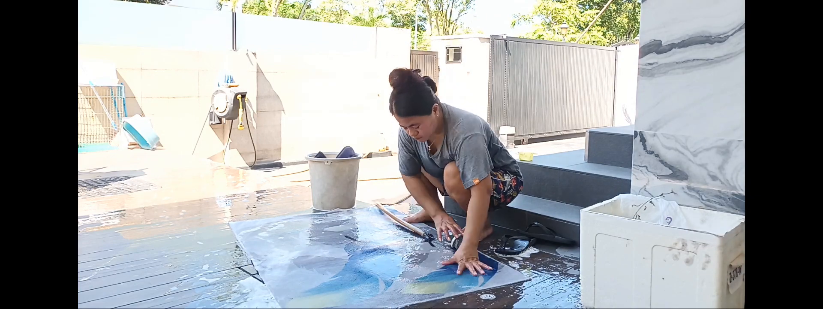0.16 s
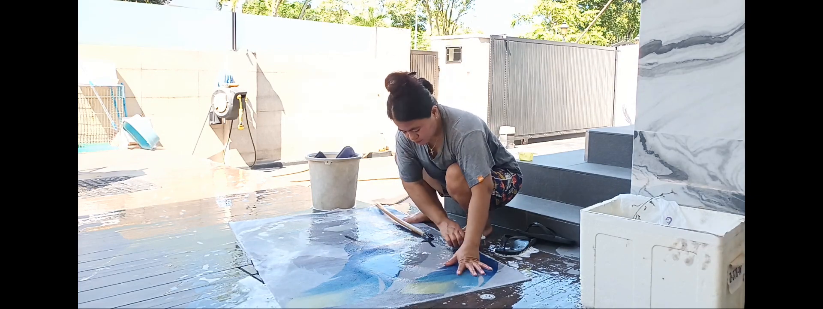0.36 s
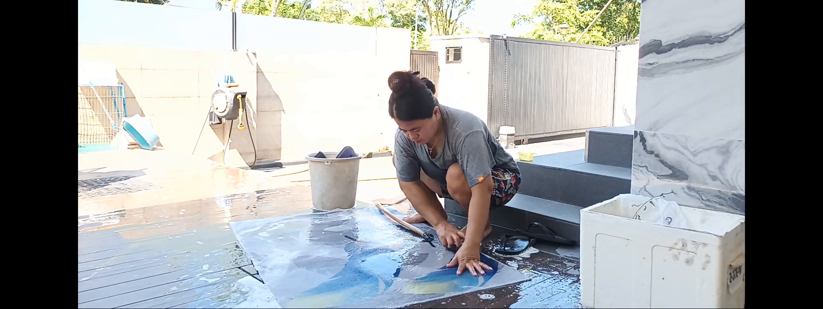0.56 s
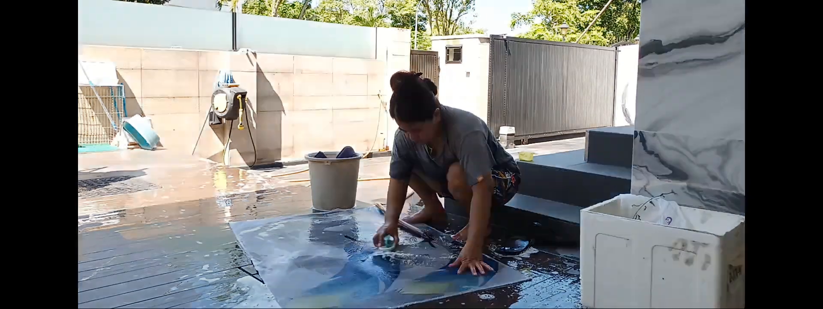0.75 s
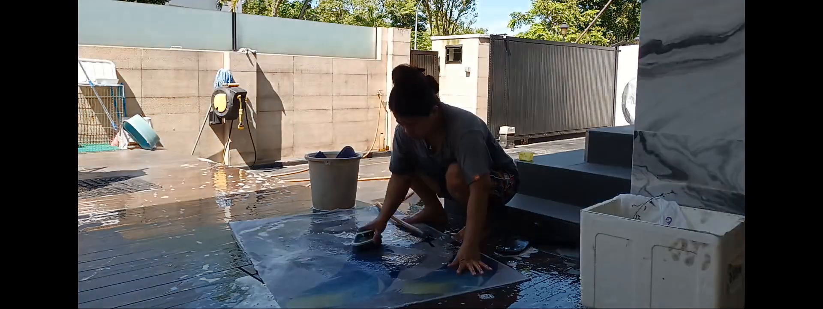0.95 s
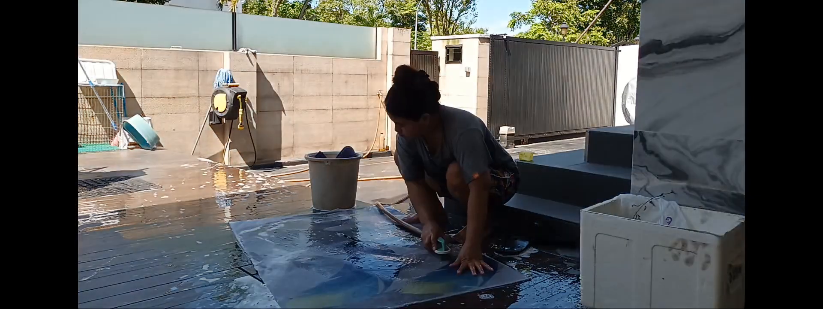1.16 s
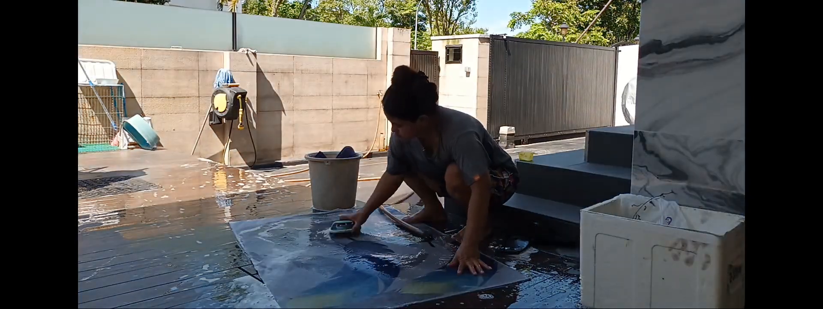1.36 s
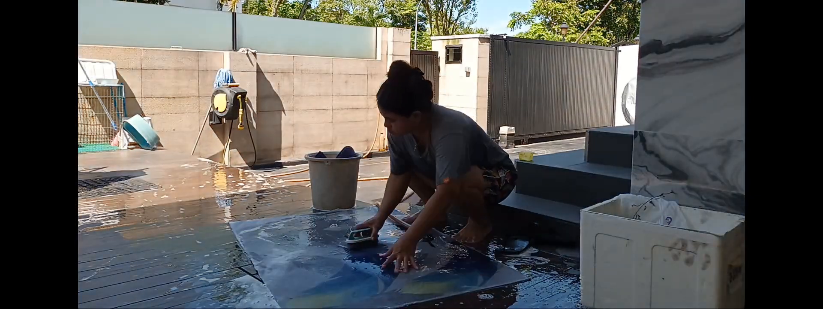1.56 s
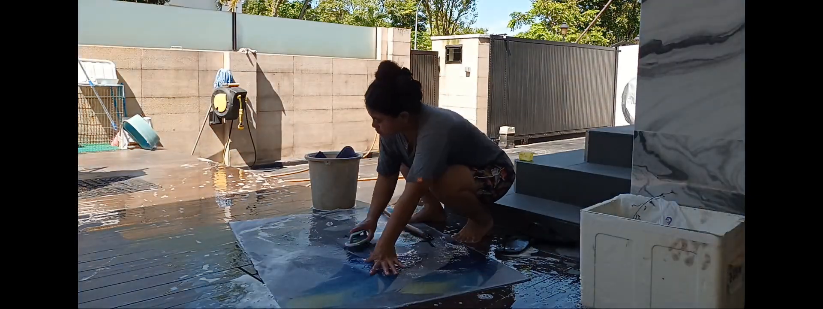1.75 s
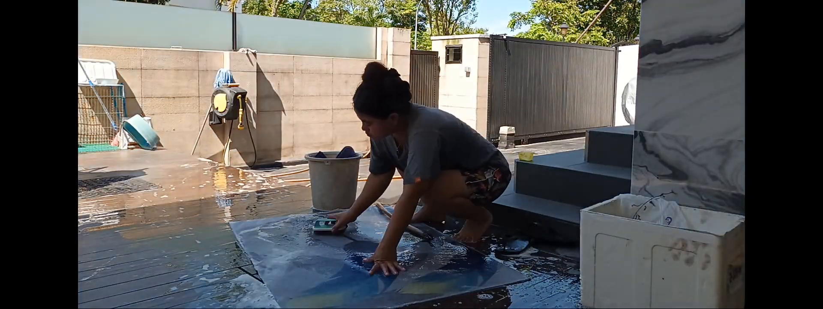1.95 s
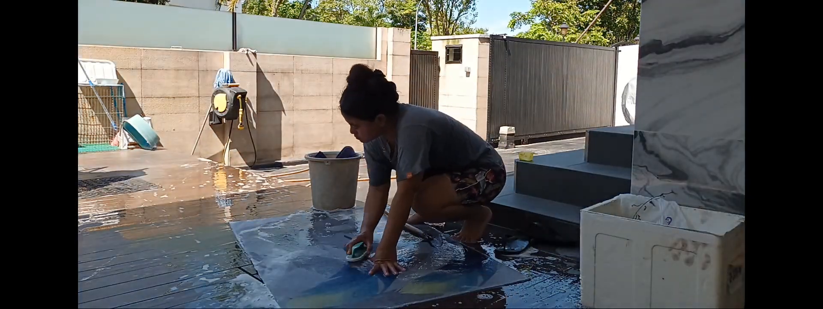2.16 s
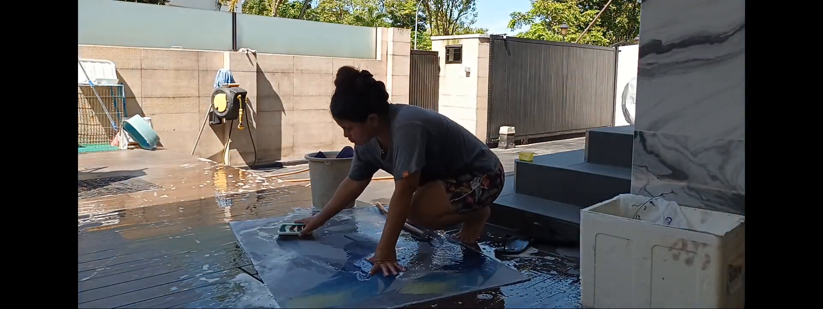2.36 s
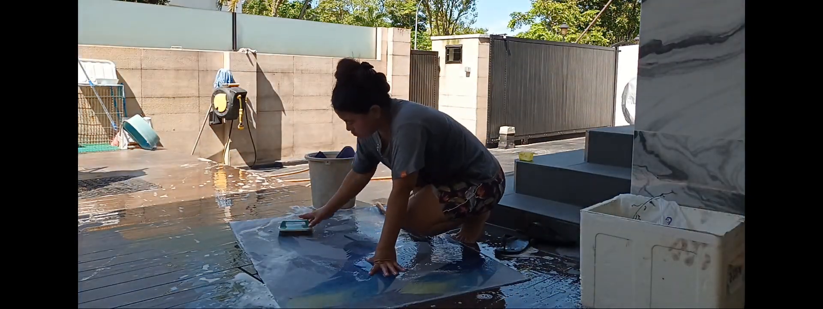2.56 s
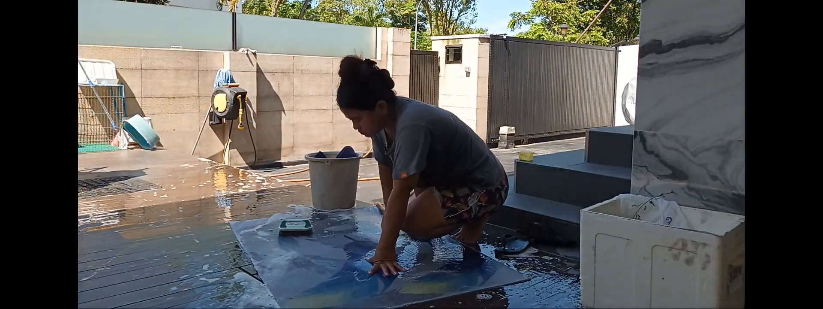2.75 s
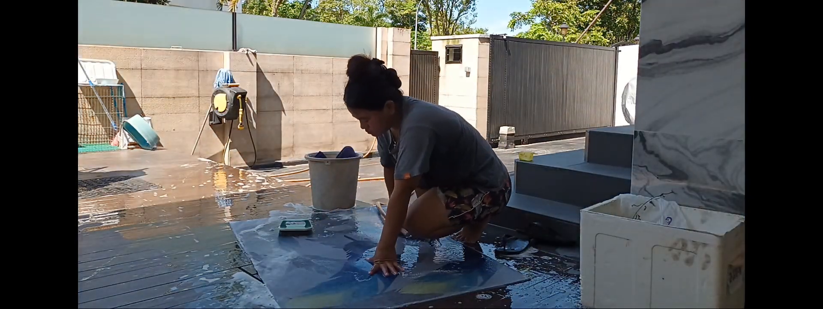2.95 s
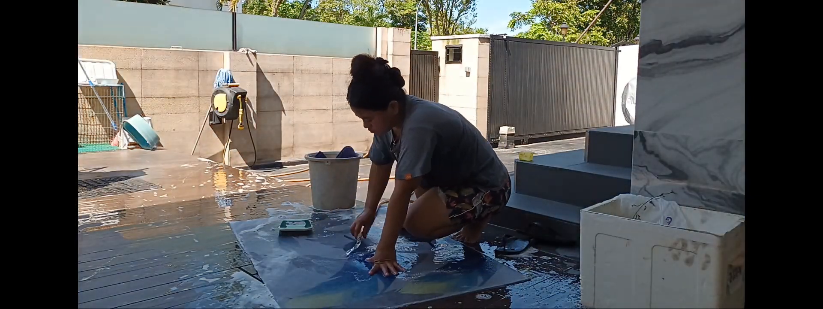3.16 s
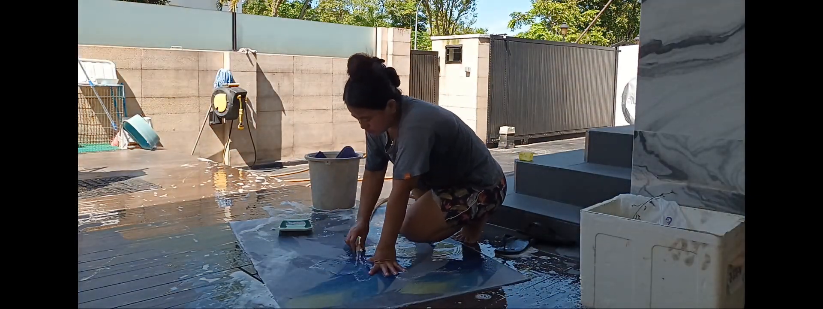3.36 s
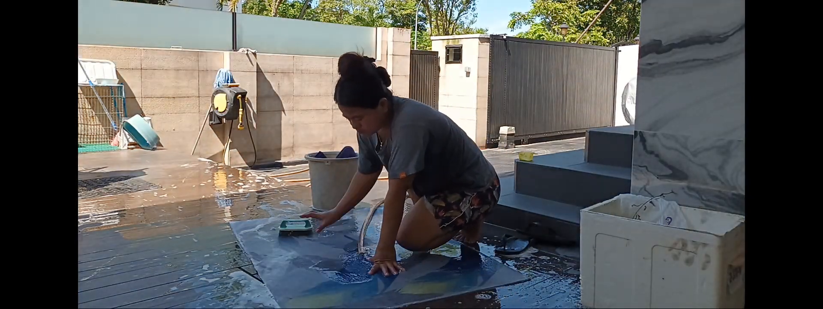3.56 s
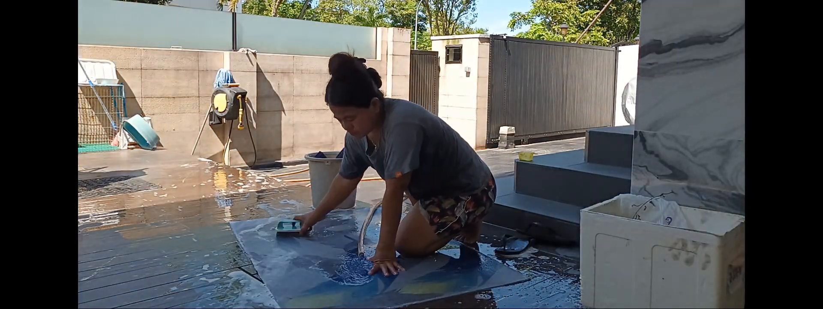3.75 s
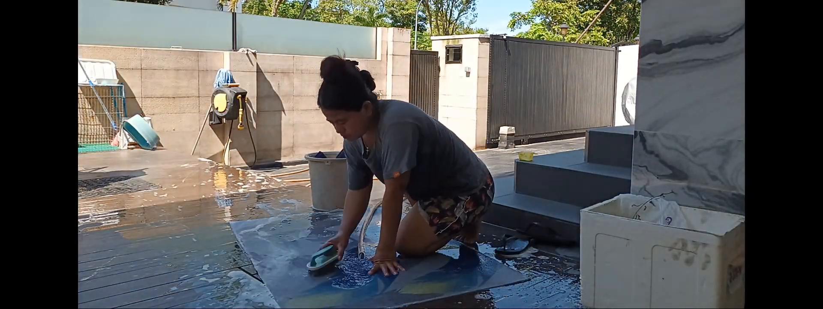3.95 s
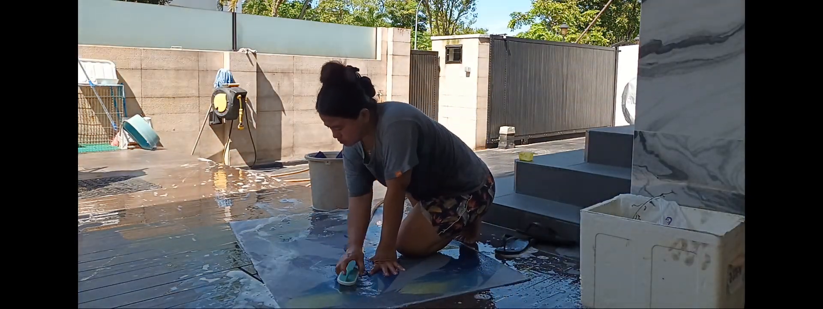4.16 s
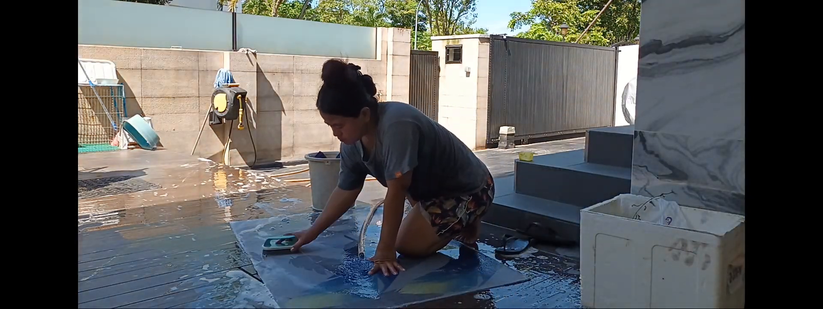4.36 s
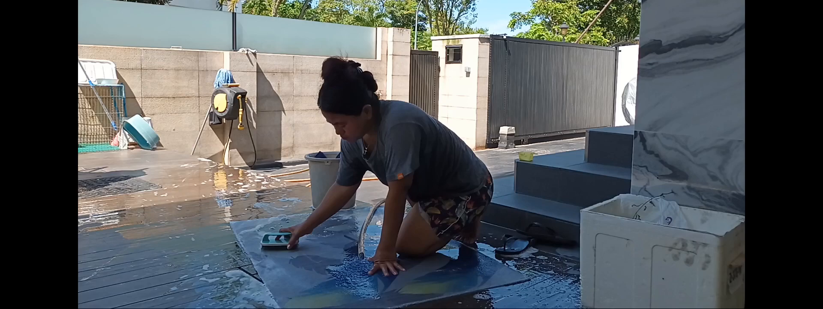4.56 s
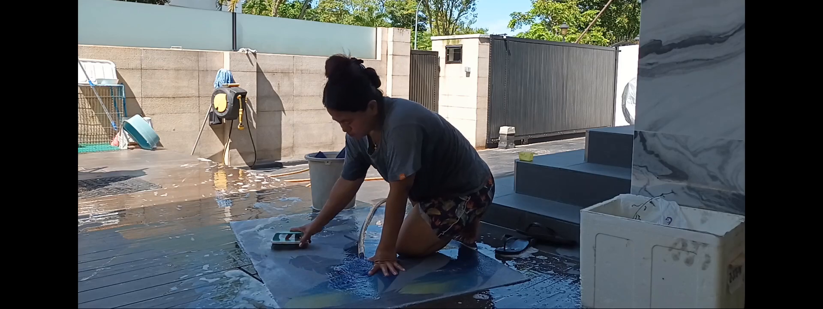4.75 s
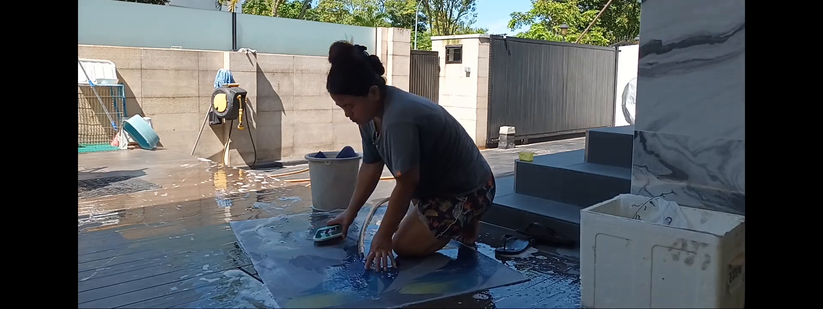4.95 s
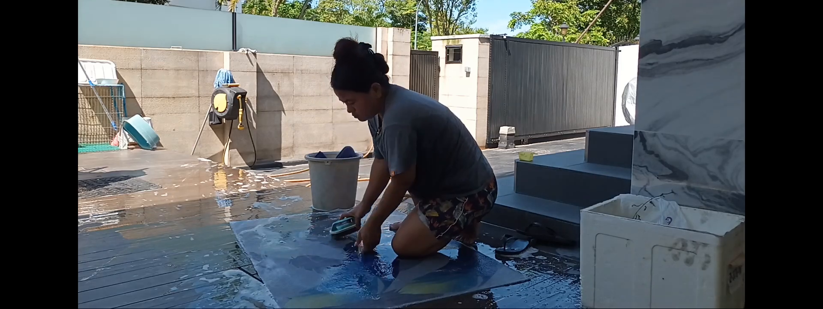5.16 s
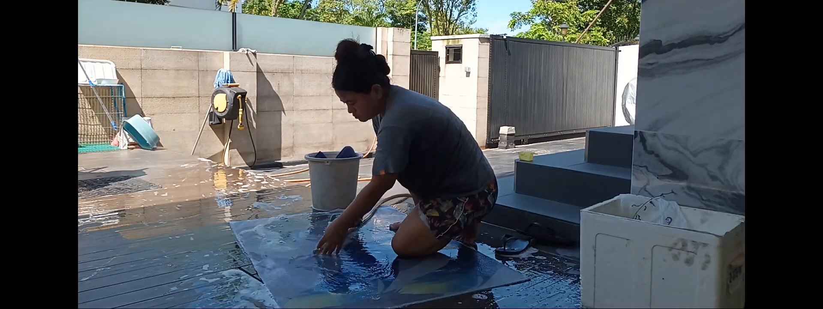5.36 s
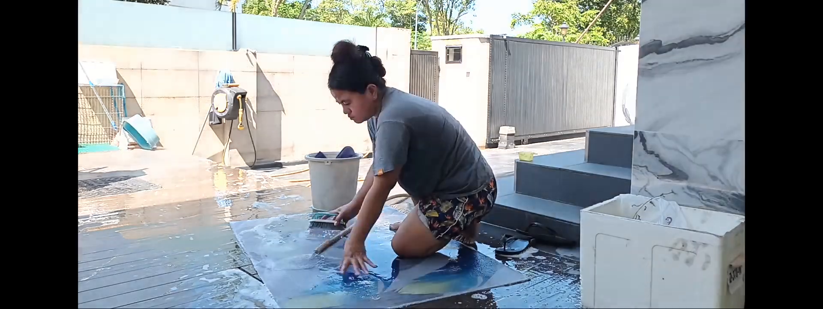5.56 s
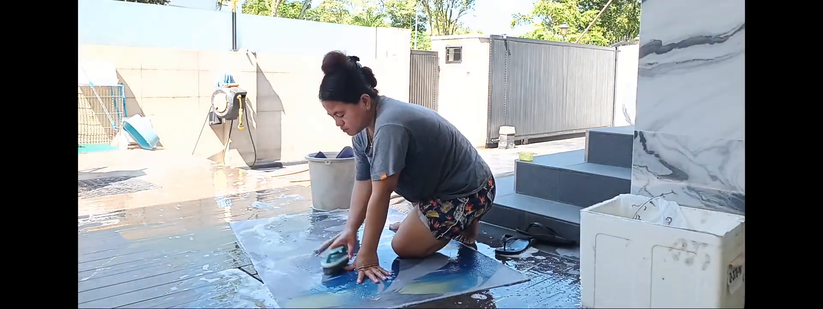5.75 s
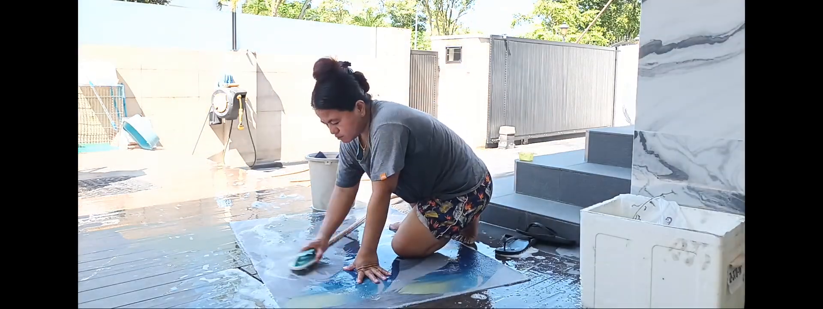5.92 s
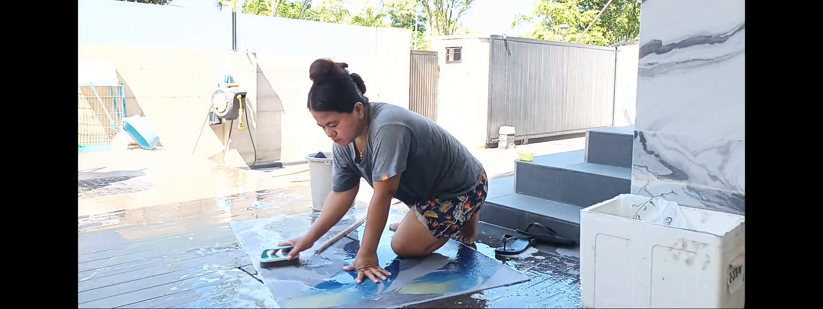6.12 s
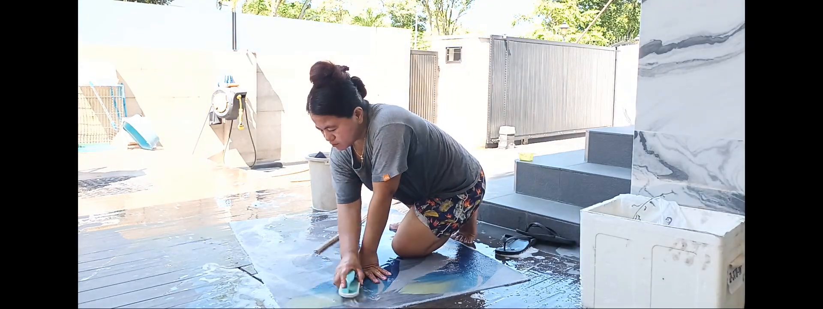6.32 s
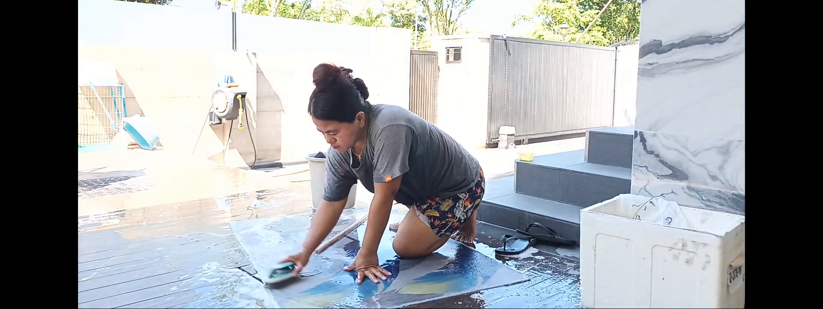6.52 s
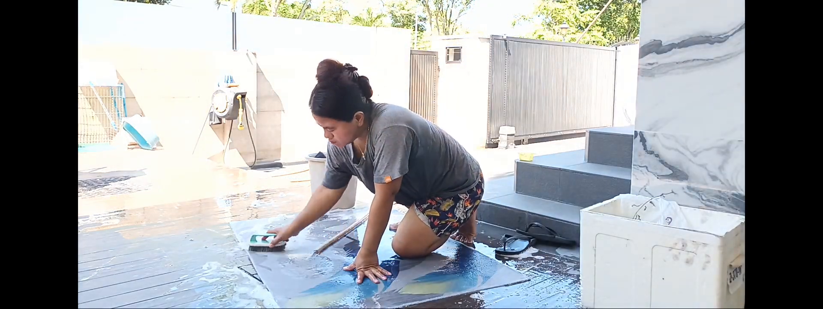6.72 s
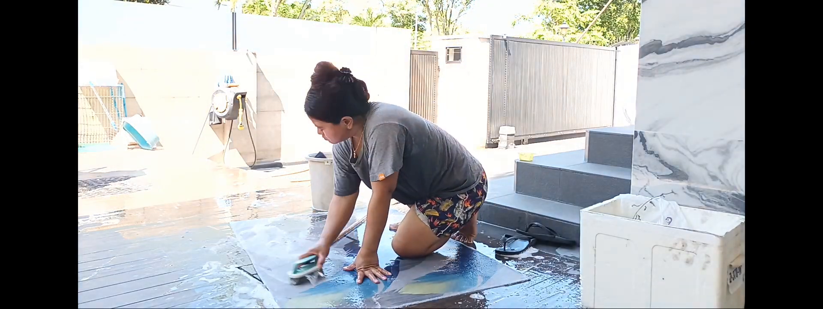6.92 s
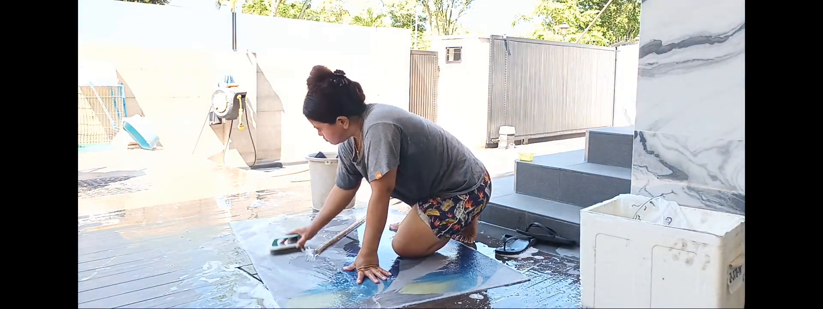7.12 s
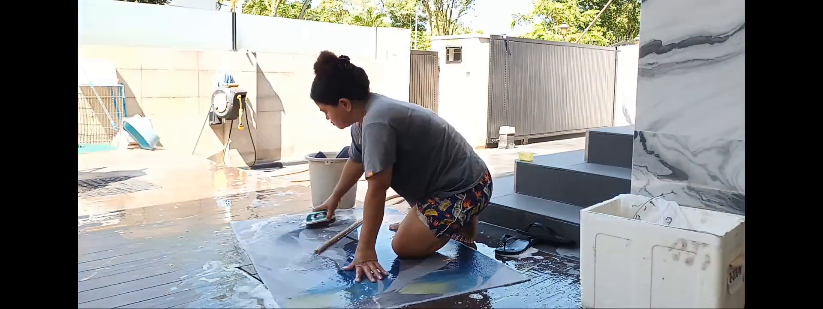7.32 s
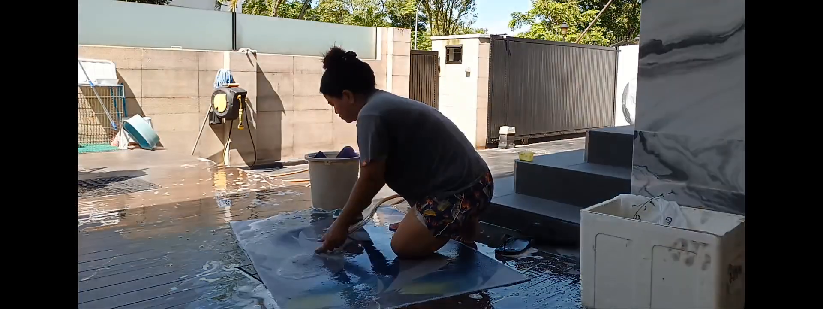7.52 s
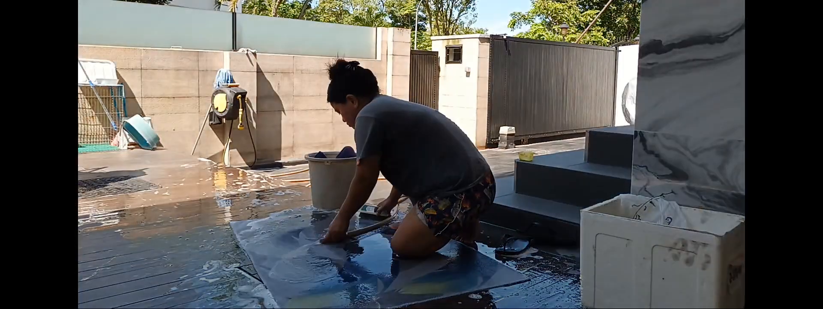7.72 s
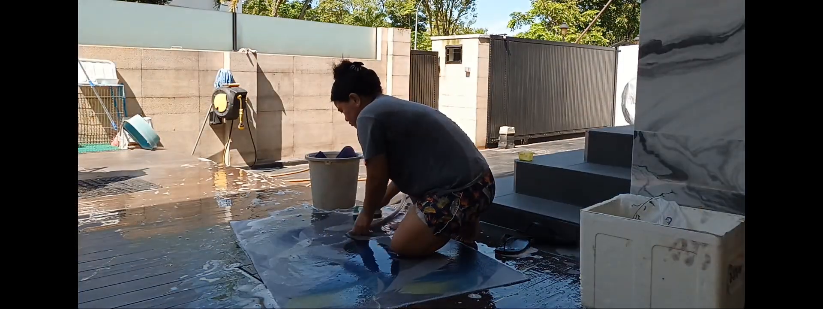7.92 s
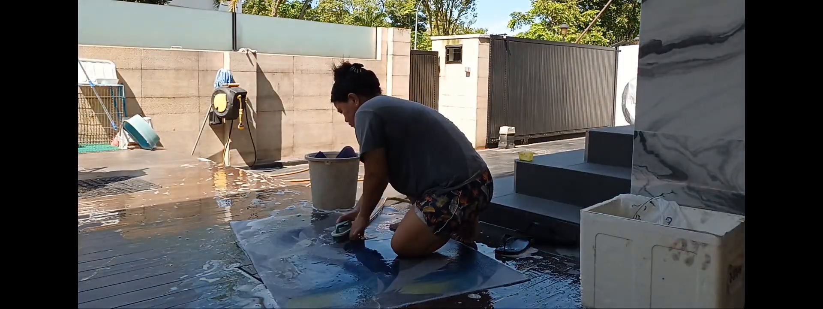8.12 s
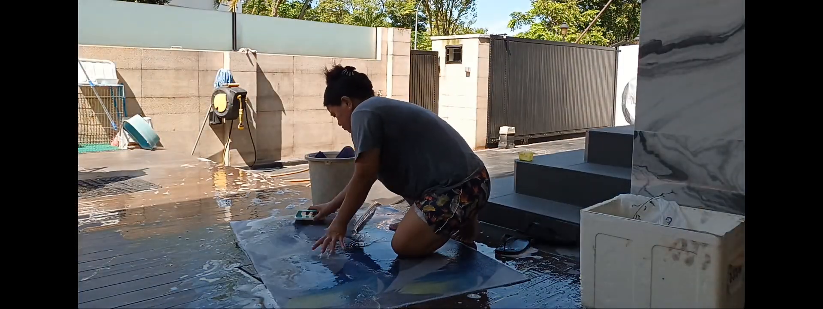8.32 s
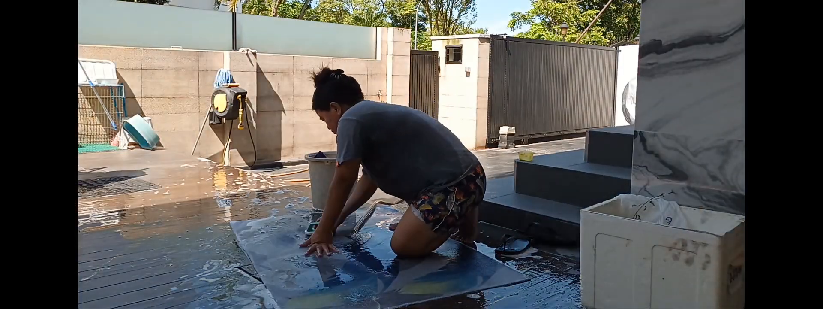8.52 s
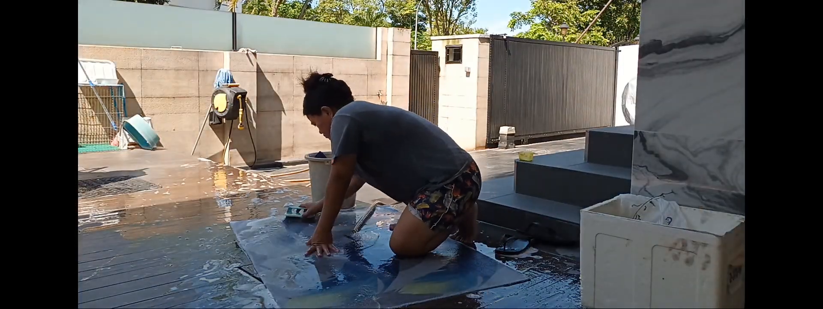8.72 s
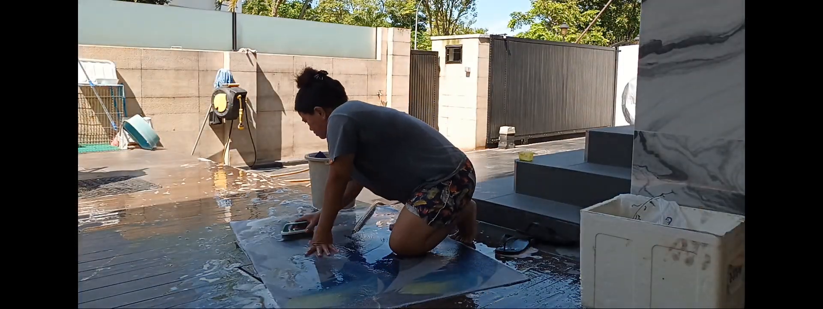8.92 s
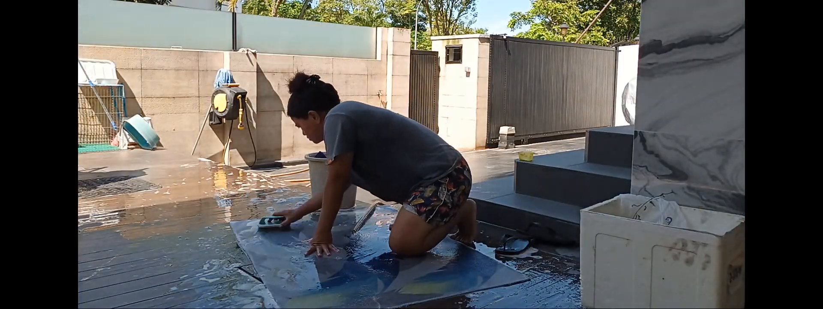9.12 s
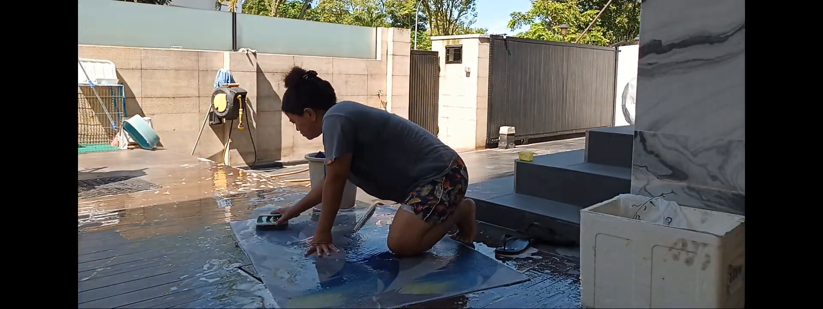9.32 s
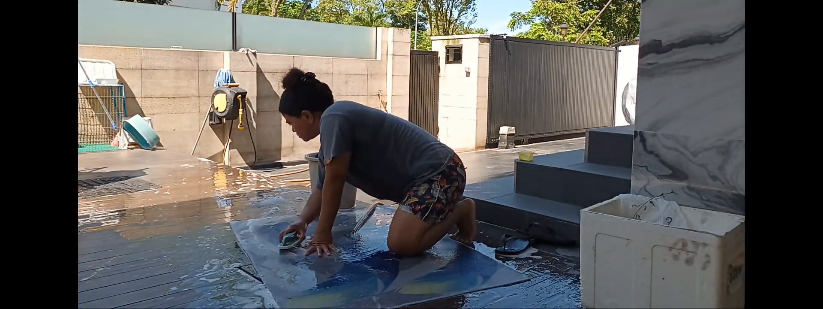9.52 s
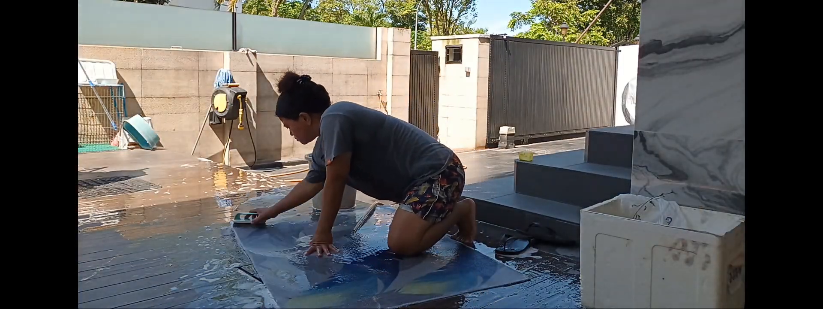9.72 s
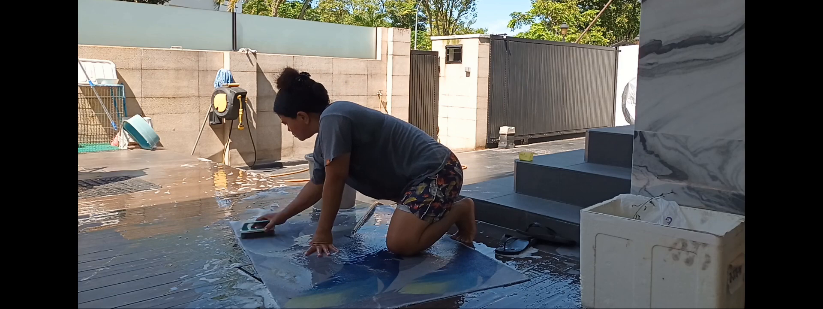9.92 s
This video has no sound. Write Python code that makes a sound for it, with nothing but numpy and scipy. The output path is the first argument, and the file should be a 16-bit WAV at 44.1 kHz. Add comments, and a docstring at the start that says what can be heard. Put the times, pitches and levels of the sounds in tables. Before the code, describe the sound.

A hand brush scrubs a wet, soapy carpet in a tiled yard. A quick run of raspy back-and-forth strokes gives way to a pause, a few bristle slaps and strokes, then two more runs, the last the fastest. Suds gurgle and foam crackles faintly behind the brush. Two dull thuds fall in the first half, and one brief squeak comes later. The walls add a short tail over quiet air.

```python
"""A tiled yard: a hand brush scrubs a soapy carpet in quick back-and-forth strokes, with pauses.
Bristle tips flick through the wet pile, their pitch arching with each stroke. Suds gurgle, foam
crackles on behind the brush, and the walls add a short tail. Now and then come wet smacks, light
knocks, faint hollow rubs, dull thuds, soft low booms and one stick-slip squeak, over quiet air."""
import sys
import numpy as np
from scipy import signal
from scipy.fft import rfft, irfft, next_fast_len
from scipy.io import wavfile
from scipy.ndimage import uniform_filter1d, map_coordinates

SR = 44100
rng = np.random.default_rng(int(sys.argv[2]) if len(sys.argv) > 2 else 0)


def generate_wav(signal):
    """Clip the signal to [-1, 1] and save it as 16-bit WAV at the path in sys.argv[1]."""
    frames = np.transpose(np.atleast_2d(signal))
    scaled = np.clip(frames, -1, 1) * 32767
    pcm = np.round(scaled).astype(np.int16)
    wavfile.write(sys.argv[1], SR, pcm)


N = 440118


# Bristle spectrum: f/Hz, level/dB
BRISTLE_SPECTRUM = [(1000, -10), (2200, -2), (3600, -3), (5000, -1.5), (6500, -3.5), (8100, -12),
                    (9300, -6.5), (10300, -1.5), (11300, -6), (12400, -19.5), (13800, -15), (14700, -15),
                    (15800, -9.5)]
def brush(level, tone):
    """Bristles bend and spring back in the wet pile; a faster stroke flicks more of them."""
    speed = np.sqrt(level / level.max())
    tips = unit(clicks(per_s=5000 + 25000 * speed, spread_db=1.6))
    hz, frame_s, spectra = signal.stft(tips, SR, nperseg=1024)
    hz, t = hz[:, None], np.arange(N) / SR
    pitch_hz, rasp_hz, rasp_db, fizz_db = [np.interp(frame_s, t, curve) for curve in tone]
    wander_oct = 0.1 * np.interp(frame_s, t, wobble(19))  # uneven grip of the pile
    shafts_db = rasp_db * hump(hz, rasp_hz * 2 ** wander_oct, octaves=0.59)
    mode1_db = 2.2 * hump(hz, 0.89 * pitch_hz, octaves=0.082)
    mode2_db = hump(hz, 1.8 * pitch_hz * 2 ** -wander_oct, octaves=0.31)
    foam_db = fizz_db * highpass(hz, 6800, order=4) ** 2
    colour = unit(amp(log_interp(BRISTLE_SPECTRUM, hz))) * amp(shafts_db + mode1_db + mode2_db + foam_db)
    colour *= highpass(hz, pitch_hz, order=9) + amp(-22.5) * highpass(hz, 340, order=3)
    lowpass = np.sqrt(1 - highpass(hz, 3500, order=1) ** 2)
    direct, scattered = spectra[0], spectra[1:]
    tufts_db = 3.2 * patches(direct.shape, bins=6, frames=5) * lowpass  # single tufts sing briefly
    echoes_db = 2.2 * patches(scattered.shape, bins=2, frames=9)
    echo_share = log_interp([(1000, 0.63), (7000, 0.7), (14000, 0.8)], hz)
    stereo = np.sqrt(1 - echo_share) * direct + np.sqrt(echo_share) * scattered
    scrub = signal.istft(stereo * colour * amp(tufts_db + echoes_db), nperseg=1024)[1][:, :N]
    catch_db = 0.2 * wobble(60)  # rows of tufts catch and slip
    return level * amp(catch_db) * scrub


# Brush strokes: t/s, rise/s, hold/s, fall/s, level/dB, lowest bristle f/Hz, sag/oct,
# shaft rasp f/Hz, rasp/dB, foam fizz/dB
BRUSH_STROKES = [(0.633, 0.18, 0.05, 0.06, -34, 1060, 0.57, 2200, 1, 0.5),
                 (0.96, 0.11, 0.023, 0.07, -32.5, 1090, 0.26, 1800, -3, -.5),
                 (1.203, 0.115, 0.045, 0.087, -29.5, 1400, 0.38, 2780, 0, 1.5),
                 (1.487, 0.124, 0.03, 0.063, -33, 1570, 0.77, 2060, -5.5, 0),
                 (1.751, 0.117, 0.025, 0.061, -28.5, 1400, 0.14, 1790, -3.5, 2.5),
                 (1.969, 0.094, 0.023, 0.095, -29.5, 1510, 0.37, 3430, -2.5, -.5),
                 (2.221, 0.118, 0.051, 0.068, -30, 1210, 0.17, 2250, 3, 2),
                 (4.021, 0.084, 0.01, 0.058, -43.5, 945, .3, 2300, -2.5, -3),
                 (4.169, 0.162, 0.056, 0.074, -28.5, 1300, .1, 2680, -1, 0),
                 (4.747, 0.112, 0.08, 0.074, -43, 1320, .15, 2480, -9, 0),
                 (5.823, 0.2, 0.02, 0.07, -31, 1070, .5, 1850, -1, 2.5),
                 (6.104, 0.13, 0.016, 0.132, -32, 1180, 0.45, 2500, -2.5, .5),
                 (6.411, 0.194, 0.045, 0.09, -30.5, 1370, 0.52, 2650, 1.5, 3),
                 (6.771, 0.113, 0.042, 0.066, -35, 1340, 0.4, 1560, 3, -3),
                 (7.05, 0.1, 0.075, 0.07, -29.5, 1480, .45, 2760, 4, -2),
                 (7.581, 0.11, 0.047, 0.17, -61, 800, 0.58, 1476, 2, 5),
                 (8.03, 0.19, 0.032, 0.04, -61, 1100, .3, 2200, -5, 10.5),
                 (8.21, 0.127, 0.008, 0.058, -34.5, 1610, 0.18, 2300, -2, -2.5),
                 (8.422, 0.115, 0.018, 0.058, -35.5, 1540, 0.42, 2270, -3.5, -6.5),
                 (8.639, 0.093, 0.018, 0.065, -30.5, 1750, 0.54, 2200, -2, 2.5),
                 (8.843, 0.109, 0.017, 0.065, -31, 1650, .7, 2100, -4.5, -4),
                 (9.069, 0.102, 0.032, 0.058, -27, 1640, 0.42, 2380, -1.5, 1.5),
                 (9.311, 0.095, 0.015, 0.07, -35.5, 1530, 0.54, 3480, 2, 0),
                 (9.565, 0.161, 0.03, 0.065, -30.5, 1400, 0.44, 2340, 2.5, 2),
                 (9.881, 0.071, 0.04, 0.163, -36, 2020, .4, 2800, 1.5, -6)]
def strokes(t):
    """Level and tone per push: high and fizzy at first, low and raspy as the shafts bend over."""
    stall_oct, rasp_growth_db, fizz_fade_db, fizz_stall_db = 0.39, 8.5, 2.5, 1
    for start_s, rise_s, hold_s, fall_s, db, pitch_hz, sag_oct, rasp_hz, rasp_db, fizz_db in BRUSH_STROKES:
        push = np.sin(np.pi / 2 * np.clip((t - start_s) / rise_s, 0, 1)) ** 2.1
        slowing = np.maximum(t - start_s - rise_s - hold_s, 0) / fall_s
        speed = push / (1 + slowing ** 3)
        contact = np.clip(3.7 - slowing, 0, 1)  # the brush lifts off
        travel = np.clip((t - start_s) / (rise_s + hold_s + fall_s), 0, 1.15) - 0.5  # 0 at mid-stroke
        yield (amp(db) * speed * contact,
               pitch_hz * 2 ** (-sag_oct * travel - stall_oct * (1 - speed)),
               rasp_hz * 2 ** (-sag_oct * travel),
               rasp_db + rasp_growth_db * travel,
               fizz_db - fizz_fade_db * travel - fizz_stall_db * (1 - speed))


# Bristle slaps on the carpet: t/s, level/dB
BRISTLE_SLAPS = [(3.884, -31), (3.997, -35), (5.81, -42)]
def slaps(t):
    """Level and tone per slap: the bristles land upright with a short, thin splash."""
    rise_s, t60_s = 0.017, 0.21
    pitch_hz, rasp_hz, rasp_db, fizz_db = 1500, 2203, -10, 1
    for start_s, db in BRISTLE_SLAPS:
        age_s = np.maximum(t - start_s, 0)
        level = amp(db - 60 * age_s / t60_s) * (1 - np.exp(-(age_s / rise_s) ** 2))
        yield np.broadcast_arrays(level, pitch_hz, rasp_hz, rasp_db, fizz_db)


def brush_motion():
    """Strokes and slaps add in power; where they overlap, the louder dominates the tone."""
    t = np.arange(N) / SR
    coarse_t = t[::64]
    moves = np.array([*strokes(coarse_t), *slaps(coarse_t)])
    power = moves[:, :1] ** 2 + 1e-20
    level = np.sqrt(power.sum(0)[0])
    tone = (power * moves[:, 1:]).sum(0) / power.sum(0)
    return np.interp(t, coarse_t, level), [np.interp(t, coarse_t, curve) for curve in tone]


# Bursting foam spectrum: f/Hz, level/dB
FOAM_SPECTRUM = [(800, -11.5), (2500, 0.5), (6000, -7.5), (8100, -16), (10200, 3.5), (13000, -26),
                 (15500, -8)]
def foam(brush_level):
    """Scrubbing whips up bubbles, which burst ever more faintly afterwards."""
    relative_db, decay_s = -27, 0.15
    pole = np.exp(-1 / (decay_s * SR))
    amount = np.sqrt(signal.lfilter([1 - pole], [1, -pole], brush_level ** 2))
    pops = filtered(clicks(per_s=2700, spread_db=1.5)[1:], lambda hz: amp(log_interp(FOAM_SPECTRUM, hz)))
    return amp(relative_db) * amount * unit(pops)


# Suds squeezed from the pile: t/s, length/s, bubble f/Hz, level/dB
SUDS_GURGLES = [(1.376, 0.049, 937, -57), (2.147, 0.099, 1210, -63), (4.072, 0.078, 1180, -59.5),
                (4.231, 0.12, 1080, -57), (5.992, 0.06, 1120, -45.5), (7.219, .17, 820, -64),
                (8.278, 0.081, 2024, -42.5), (8.743, 0.064, 1514, -48.5), (8.96, .07, 1800, -45.5),
                (9.2, .1, 1220, -52), (9.489, 0.11, 1200, -60)]
def gurgles():
    """Clusters of small bubbles ring, larger and lower as suds pile up before the brush."""
    bubbles_per_s, spread_oct, sag_oct, spread_db, t60_cycles = 450, 0.13, 0.19, 4, 53
    out, t = np.zeros(N), np.arange(SR // 16) / SR
    for start_s, length_s, hz, db in SUDS_GURGLES:
        count = max(round(bubbles_per_s * length_s), 2)
        cluster = np.zeros(round(length_s * SR) + len(t))
        for progress, detune, strength in zip(rng.beta(2, 2, count), *rng.standard_normal((2, count))):
            pitch_hz = hz * 2 ** (spread_oct * detune - sag_oct * (progress - 0.5))
            bubble = ring(t, pitch_hz, t60_cycles / pitch_hz)
            add(cluster, progress * length_s, amp(spread_db * strength) * bubble)
        rms = np.sqrt(np.sum(cluster ** 2) / (length_s * SR))
        add(out, start_s, amp(db) * cluster / rms)
    return out


def squeak():
    """A wet tuft sticks and slips six times in quick succession, each slip weaker."""
    start_s, gap_s, hz, db, loss_db = 7.572, 0.0089, 2030, -31, 2.5
    out, t = np.zeros(N), np.arange(SR // 8) / SR
    for k, (jitter, detune) in enumerate(rng.standard_normal((6, 2))):
        slip = ring(t, hz * (1 + 0.021 * detune), t60_s=0.022, rise_s=0.0014)
        add(out, start_s + gap_s * (k + 0.077 * jitter), amp(db - loss_db * k) * slip)
    return out


# Knocks of the brush back: t/s, f/Hz, level/dB
BRUSH_KNOCKS = [(1.088, 720, -48), (1.855, 630, -42.5)]
def knocks(t60_s=0.077):
    """The plastic back rings briefly in a low mode and a weaker upper one."""
    out, t = np.zeros(N), np.arange(SR // 4) / SR
    for start_s, hz, db in BRUSH_KNOCKS:
        add(out, start_s, amp(db) * (ring(t, hz, t60_s) + 0.5 * ring(t, 1.6 * hz, t60_s / 2)))
    return out


# Wet skin on the carpet: t/s, bubble f/Hz, level/dB
WET_SMACKS = [(.314, 1710, -67), (.454, 1310, -62), (.495, 1277, -57.5), (0.601, 1345, -57.5)]
def smacks(spray_db=-9, spray_t60_s=0.27):
    """Each smack rings one bubble and throws a short spray."""
    bubbles, spray_level, t = np.zeros(N), np.zeros(N), np.arange(SR // 4) / SR
    for start_s, hz, db in WET_SMACKS:
        add(bubbles, start_s, amp(db) * ring(t, hz, t60_s=0.07))
        add(spray_level, start_s, amp(db + spray_db - 60 * t / spray_t60_s))
    spray = unit(filtered(rng.standard_normal(N), lambda hz: hump(hz, 1800, octaves=1.2)))
    return bubbles + spray_level * spray


# Rubs and rustles: t/s, f/Hz, width/Hz, level/dB, length/s
FAINT_RUBS = [(1.42, 517.6, 110, -62, .24), (2.42, 627, 220, -63, 0.18), (5.38, 1200, 1196, -65, 0.23),
              (5.64, 1305, 1200, -61.5, 0.27), (5.42, 618, 260.5, -64.5, 0.69), (5.6, 310, 101, -51, 0.2),
              (5.8, 336, 70, -42, 0.082), (5.9, 340.4, 90.4, -52.5, 0.37), (9.35, 483, 40, -55.5, 0.074),
              (9.8, 478, 238.5, -57.5, 0.21)]
def rubs():
    """Faint, uneven swells of noise; the narrow ones sound hollow."""
    return swells(FAINT_RUBS, flutter_db=3.5)


# Heavy blows: t/s, level/dB
THUD_HITS = [(1.18, -26.5), (4.717, -31.5)]
# Their modes: f/Hz, level/dB, t60/s
THUD_RESONANCES = [(51.4, -8.5, 1), (99.7, 3.5, 0.4), (173, -5, 0.37), (335.2, -10.5, 0.62)]
def thuds():
    """A soft, heavy blow swells into low modes, with a short muffled shudder."""
    rise_s, shudder_db, shudder_t60_s = 0.028, -6.5, 0.62
    out, t = np.zeros(N), np.arange(SR) / SR
    attack = 1 - np.exp(-(t / rise_s) ** 2)
    for start_s, db in THUD_HITS:
        body = sum(amp(mode_db - 60 * t / t60_s) * np.sin(2 * np.pi * (hz * t + rng.random()))
                   for hz, mode_db, t60_s in THUD_RESONANCES)
        rumble = unit(filtered(rng.standard_normal(N), lambda hz: 1 - highpass(hz, 495, order=4) ** 2))
        shudder = amp(shudder_db - 60 * t / shudder_t60_s) * rumble[:SR]
        add(out, start_s, amp(db) * attack * (body + shudder))
    return out


# Soft booms: t/s, f/Hz, level/dB, length/s
LOW_BOOMS = [(1.492, 52, -51.5, 0.26), (2.244, 46.8, -53, 0.3), (7.471, 52.3, -46.5, 0.38),
             (7.833, 52, -51, 0.3), (8.679, 51.8, -48, 0.34), (9.042, 62.4, -50.5, 0.21),
             (9.264, 62.2, -49.5, 0.21), (9.6, 68, -50.5, 0.2)]
def booms(low_width_hz=14, octave_width_hz=40):
    """A low, nearly pure swell with a weaker, rougher octave, more felt than heard."""
    low = [(start_s, hz, low_width_hz, db, length_s) for start_s, hz, db, length_s in LOW_BOOMS]
    octave = [(start_s, 2 * hz, octave_width_hz, db - 10, length_s)
              for start_s, hz, db, length_s in LOW_BOOMS]
    return swells(low, flutter_db=0) + swells(octave, flutter_db=3)


# Yard reverberation: f/Hz, t60/s
YARD_DECAY = [(200, 0.14), (2000, 0.25), (6000, 0.1), (14000, 0.025)]
def yard(x, tail_db):
    """The walls add a short tail, uncorrelated left and right."""
    hz, t, spectra = signal.stft(rng.standard_normal((2, SR // 2)), SR, nperseg=256)
    decay = amp(-60 * t / log_interp(YARD_DECAY, hz)[:, None])
    tail = signal.istft(spectra * decay, SR, nperseg=256)[1]
    tail /= np.linalg.norm(tail[0])
    return x + amp(tail_db) * signal.fftconvolve(np.atleast_2d(x), tail, axes=1)[:, :N]


# Still-air spectrum: f/Hz, level/dB
AIR_SPECTRUM = [(25, -3.5), (110, -1), (200, -8), (400, -14), (1000, -22), (2500, -25.5), (6000, -25),
                (8100, -34.5), (9900, -24.5), (13600, -35.5), (15200, -31)]
def air():
    """Distant rumble, alike on both sides, under a faint uncorrelated hiss."""
    width = lambda hz: np.clip(highpass(hz, 380, order=1), 0.15, 1)
    colour = lambda hz: amp(log_interp(AIR_SPECTRUM, hz))
    rumble = filtered(rng.standard_normal(N), lambda hz: colour(hz) * np.sqrt(1 - width(hz) ** 2))
    hiss = filtered(rng.standard_normal((2, N)), lambda hz: colour(hz) * width(hz))
    return amp(-61 + 0.63 * wobble(3.44)) * unit(rumble + hiss)


def swells(rows, flutter_db):
    """Noise bands that rise quickly and fade."""
    out = np.zeros(N)
    for start_s, hz, width_hz, db, length_s in rows:
        progress = np.linspace(0, 1, round(length_s * SR))
        t = progress * length_s
        re, im = [map_coordinates(k, [t * width_hz], order=1) for k in rng.standard_normal((2, 2000))]
        band = unit(re * np.cos(2 * np.pi * hz * t) + im * np.sin(2 * np.pi * hz * t))
        add(out, start_s, amp(db) * np.sin(np.pi * progress ** 0.5) * band)
    return out * amp(flutter_db * wobble(35))


def clicks(per_s, spread_db):
    """Three random impulse trains: direct, left, right."""
    count = rng.poisson(per_s / SR, (3, N))
    impulses = np.sqrt(count / per_s) * rng.standard_normal((3, N))
    return impulses * amp(spread_db * rng.standard_normal((3, N)))


def ring(t, hz, t60_s, rise_s=0.00047):
    """Damped sine with a soft start."""
    return np.sin(2 * np.pi * hz * t) * amp(-60 * t / t60_s) * (1 - np.exp(-t / rise_s))


def wobble(knots_per_s):
    """Smooth random curve."""
    knots = rng.standard_normal(int(N * knots_per_s / SR) + 4)
    return map_coordinates(knots, [np.arange(N) * knots_per_s / SR])


def patches(shape, bins, frames):
    """Random field of rms 1, smooth in frequency and time."""
    field = uniform_filter1d(rng.standard_normal(shape), bins, axis=-2)
    return unit(uniform_filter1d(field, frames, axis=-1))


def filtered(x, response):
    """Apply a frequency response."""
    size = next_fast_len(N + SR // 2)
    return irfft(rfft(x, size) * response(np.fft.rfftfreq(size, 1 / SR)), size)[..., :N]


def highpass(hz, edge_hz, order):
    return 1 / np.sqrt(1 + (edge_hz / (hz + 1)) ** (2 * order))


def hump(hz, centre_hz, octaves):
    """Resonance of height 1."""
    return np.exp(-(np.log2((hz + 1) / centre_hz) / octaves) ** 2)


def log_interp(points, hz):
    """Interpolate (f/Hz, value) points over log frequency."""
    knots_hz, values = np.transpose(points)
    return np.interp(np.log(hz + 1), np.log(knots_hz + 1), values)


def add(track, start_s, sound):
    part = track[round(start_s * SR):][:len(sound)]
    part += sound[:len(part)]


def amp(db):
    return 10 ** (np.asarray(db) / 20)


def unit(x):
    return x / np.sqrt(np.mean(x ** 2) + 1e-20)


def scene():
    """The brush and the small sounds echo in the yard, over foam, thuds, booms and still air."""
    level, tone = brush_motion()
    small_sounds = smacks() + knocks() + gurgles() + rubs()
    scrubbing = brush(level, tone) + squeak()
    echoing = yard(scrubbing, tail_db=-9) + yard(small_sounds, tail_db=-2.5)
    return echoing + foam(level) + thuds() + booms() + air()


def record(dry):
    """Band-limited stereo; the left side is slightly late and duller at the very top."""
    delay_s, top_hz = 0.00104, 15830
    left_db = lambda hz: log_interp([(100, -1.2), (2000, -0.4), (9500, 0.6), (13000, -3)], hz)
    left = lambda hz: np.exp(-2j * np.pi * hz * delay_s) * amp(left_db(hz))
    right = lambda hz: amp(log_interp([(9500, 0.068), (13000, 0.62)], hz))
    return filtered(dry, lambda hz: np.array([left(hz), right(hz)]) * (hz < top_hz))


dry = scene()
out = record(dry)
generate_wav(out)
```